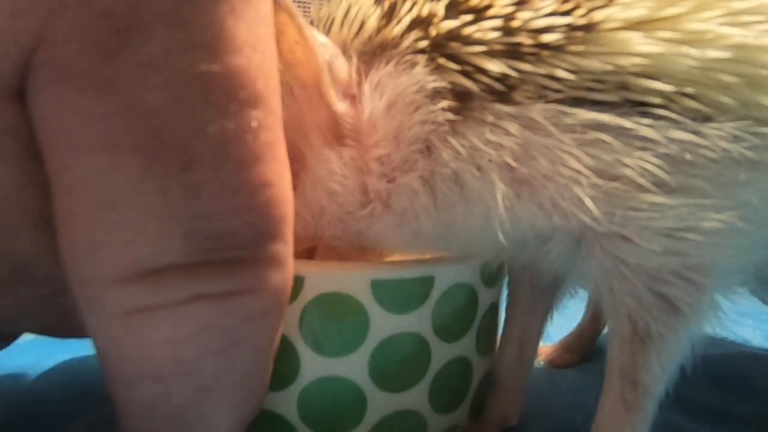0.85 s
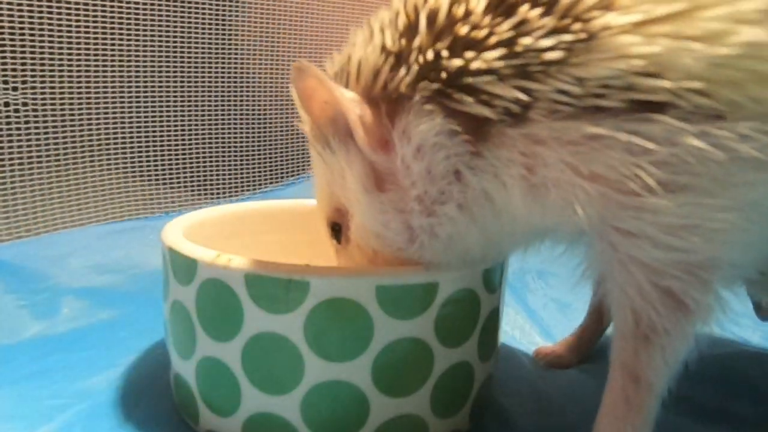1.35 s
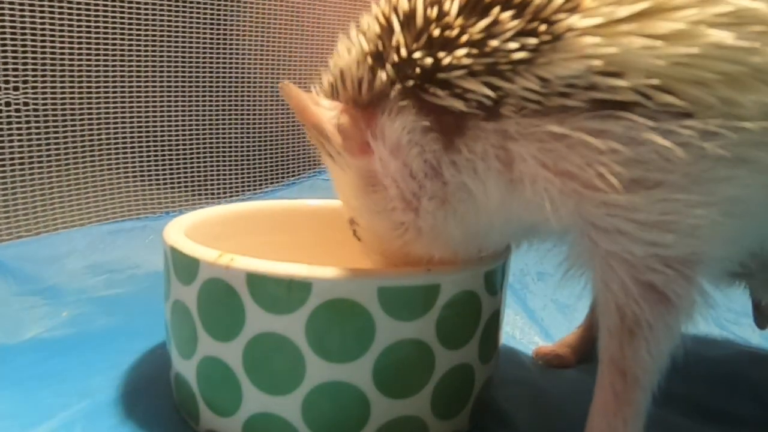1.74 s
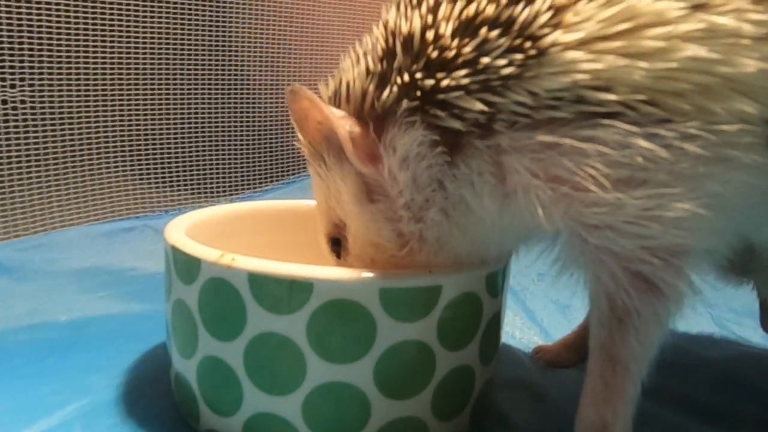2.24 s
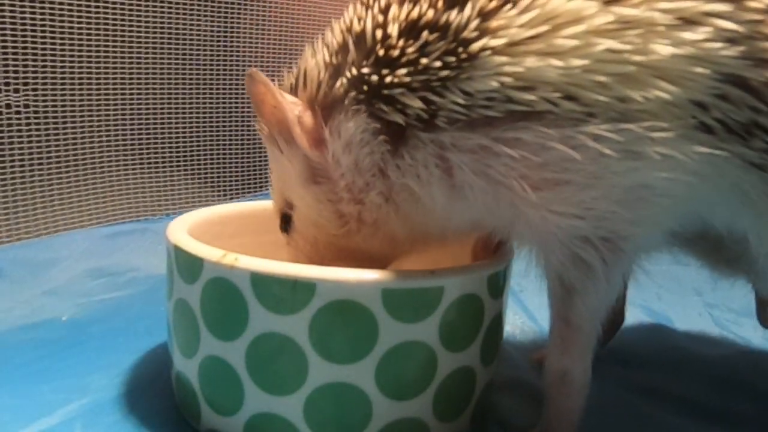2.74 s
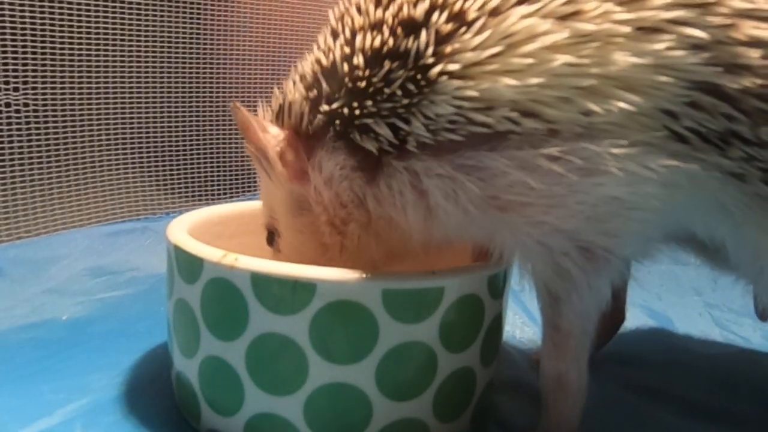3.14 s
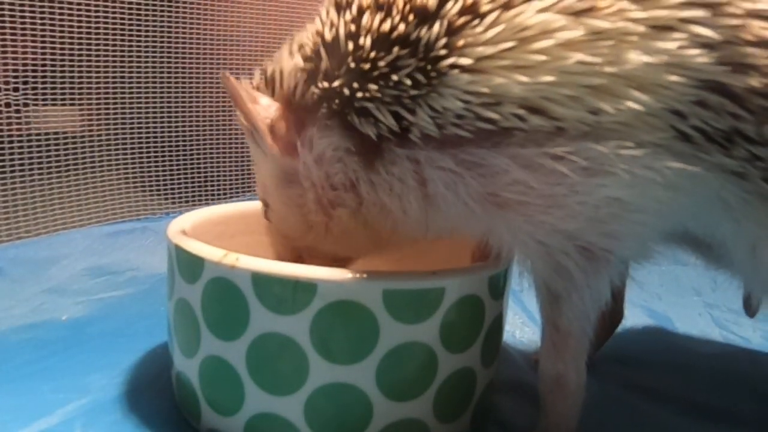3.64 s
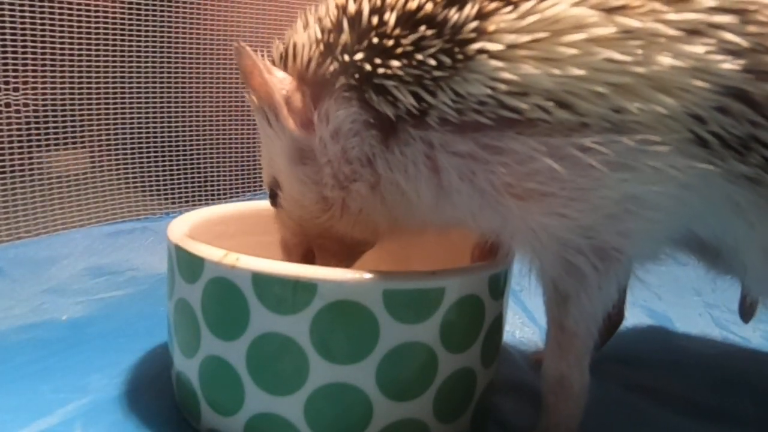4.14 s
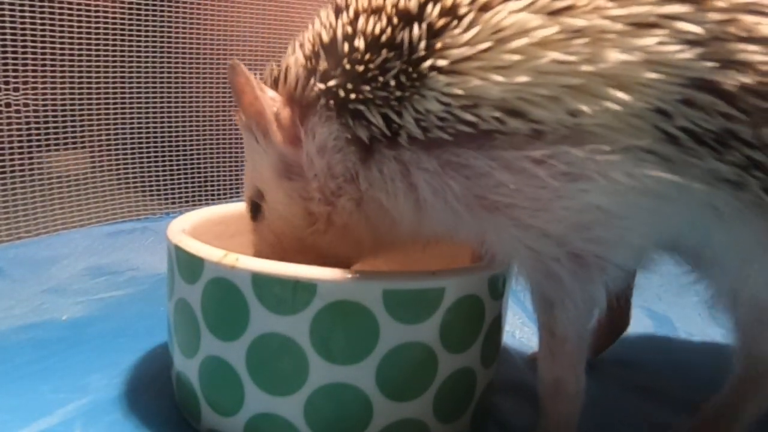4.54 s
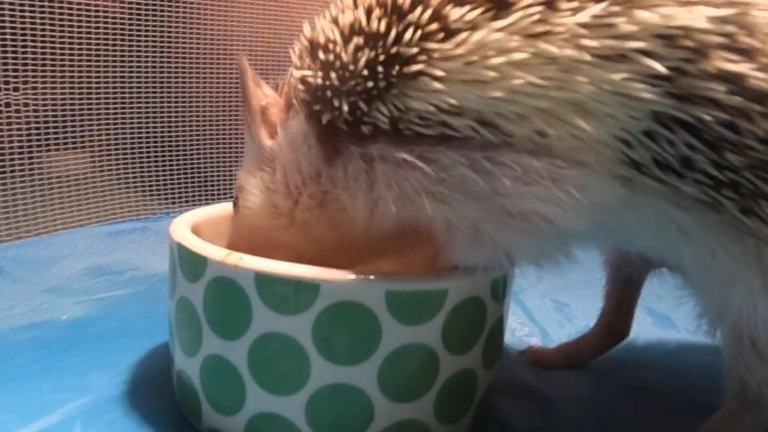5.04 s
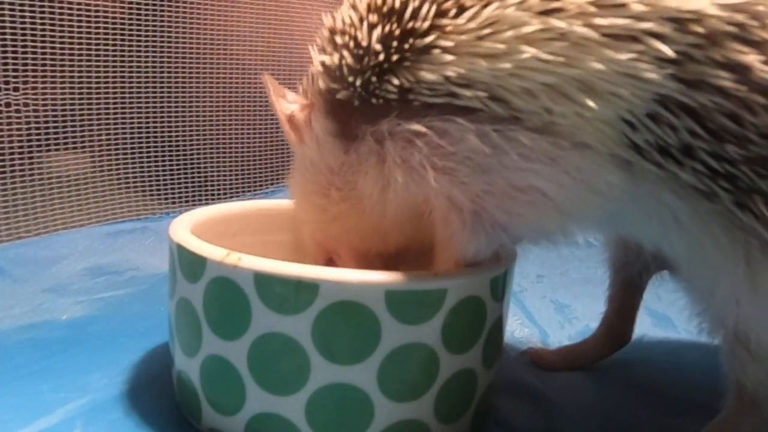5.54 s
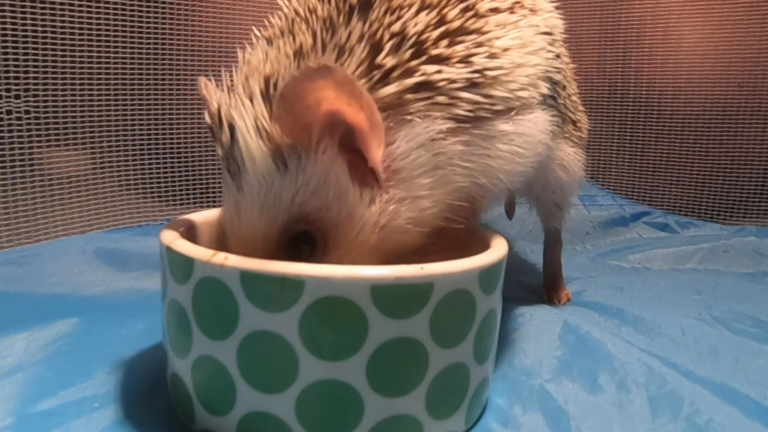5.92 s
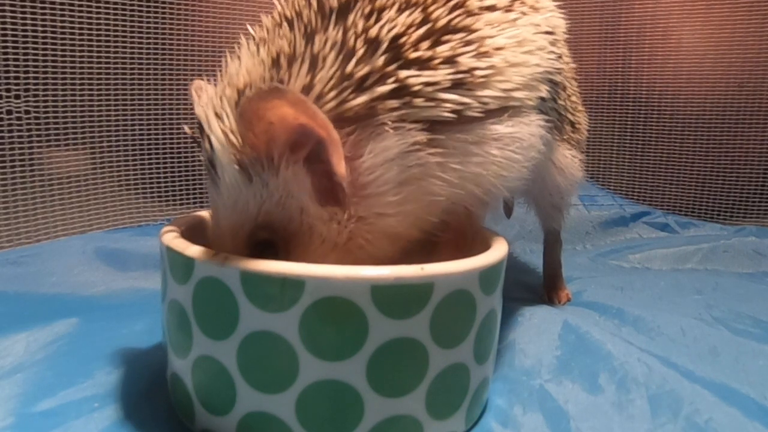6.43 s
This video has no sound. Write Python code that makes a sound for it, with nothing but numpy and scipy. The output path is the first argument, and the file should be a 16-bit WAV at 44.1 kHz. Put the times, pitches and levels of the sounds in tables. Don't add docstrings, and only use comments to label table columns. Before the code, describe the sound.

Close, rapid wet licking and smacking at a small ceramic bowl, about five a second, with faint knocks and gritty ticks in a quiet room.

```python
import sys
import numpy as np
from scipy import signal
from scipy.fft import rfft, irfft, next_fast_len
from scipy.io import wavfile
from scipy.ndimage import uniform_filter1d, map_coordinates

SR = 44100
rng = np.random.default_rng(int(sys.argv[2]) if len(sys.argv) > 2 else 0)


def ratio(d):
    e = np.asarray(d, float) / 20
    return 10 ** e


def generate_wav(signal):
    frames = np.transpose(np.atleast_2d(signal))
    scaled = np.clip(frames, -1, 1) * 32767
    pcm = np.round(scaled).astype(np.int16)
    wavfile.write(sys.argv[1], SR, pcm)


N = 294588

# (time [s], smack level [dB], wet body re smack [dB], bowl knock re smack [dB])
FULL_LICKS = [(0.89, -51, 2, -24), (1.215, -49.5, -4, -13), (1.477, -54, -3, -7.5), (1.68, -51, -7, -10),
              (1.89, -52.5, -6, -6), (2.09, -49.5, -21, -7.5), (2.281, -48, -5.5, -6),
              (2.484, -52, -5, -17), (2.677, -52.5, -3, -4), (2.875, -47, -8.5, -12), (3.073, -51, -5, -8),
              (3.27, -52.5, -6, -9), (3.466, -50.5, -9, -20), (3.663, -51, -5.5, -7),
              (3.872, -53, -0.5, -5.5), (4.075, -51.5, -4.5, -3), (4.285, -53.5, -6, -2.5),
              (4.494, -55.5, -6, -5.5), (4.691, -55, -3.5, -5), (4.9, -51.5, -24, -9),
              (5.108, -54.5, -2, -9), (5.339, -53.5, -0.5, -5.5), (5.585, -51.5, -6.5, -5),
              (5.869, -47, -1, -4.5), (6.153, -55, -0.5, -2), (6.401, -56.5, -0.5, -3),
              (6.63, -55.5, -6, 0)]
# (time [s], smack level [dB], wet body re smack [dB])
RETURN_LICKS = [(0.026, -64, 9), (1.05, -62.5, 9), (1.313, -63.5, 9.5), (1.56, -58.5, 2),
                (1.772, -59.5, -4), (1.972, -60.5, -20), (2.172, -59, -17.5), (2.364, -61, -13),
                (2.566, -57.5, -21), (2.76, -62, -11), (2.957, -61, -15), (3.152, -59.5, -23),
                (3.351, -61, -58), (3.556, -61, 0.5), (3.76, -63, 3.5), (3.962, -63.5, 5),
                (4.166, -62, -23.5), (4.381, -64, -21), (4.58, -61.5, 2.5), (4.791, -65, -38),
                (4.998, -65.5, 9), (5.21, -80, -5), (5.71, -69, 7), (5.97, -74, -0.5), (6.26, -70, -3),
                (6.5, -75, -6)]
# (time [s], level [dB])
TIP_TOUCHES = [
    (1.657, -58),
    (2.07, -57),
    (2.261, -53),
    (3.048, -53),
    (3.85, -58),
    (4.252, -56),
]
# (frequency [Hz], width [Hz], level [dB])
SMACK_MODES = [(9300, 2870, 31), (7540, 580, 5), (13000, 2900, 6)]
# (frequency [Hz], width [Hz], level [dB])
MOUTH_MODES = [(5130, 2430, 0.5), (2850, 3600, 1.5)]
# (frequency [Hz], width [Hz], level [dB])
FOOT_MODES = [(724, 440, 0)]
# (frequency [Hz], width [Hz], level [dB])
WALL_MODES = [(1380, 310, 0)]
# (time [s], peak [dB])
FOOD_SNAPS = [(1.2155, -33.5), (1.218, -38), (1.6723, -42), (1.6766, -42), (1.6828, -37), (1.888, -44),
              (2.0883, -43), (2.09, -38), (2.28, -38), (2.2813, -42), (2.4868, -39), (2.6763, -38),
              (2.8756, -37.5), (3.0746, -39), (3.153, -40), (3.2654, -40), (3.2683, -36.5), (3.4646, -34),
              (3.6591, -39), (3.6632, -42), (3.8704, -38), (4.071, -38), (4.0768, -42), (4.2828, -36.5),
              (4.492, -47), (4.4937, -39), (4.6873, -44), (4.6915, -38), (4.899, -43), (5.58, -35),
              (5.5844, -35.5), (5.867, -51), (5.8704, -42), (6.4028, -40), (6.6245, -45), (6.63, -42)]
# (time [s], peak [dB], ring [Hz])
BUBBLES = [(.1091, -54, 8970), (.112, -57, 9300), (.1182, -57, 8960), (.1699, -43, 7400),
           (.5048, -50, 9250), (.531, -52, 9430), (.5374, -52, 9320), (.5422, -54, 9310),
           (.5881, -43, 8400), (.6325, -53, 10600), (.6327, -57, 6000), (1.1902, -58, 8340),
           (1.2417, -49, 8610), (1.3911, -58, 9130), (1.4061, -59, 8840), (1.7227, -52, 9000),
           (1.7869, -51, 9350), (1.8742, -56, 8860), (2.1732, -51, 8520), (2.7442, -61, 10460),
           (2.825, -48, 9240), (2.837, -56, 8910), (2.8495, -54, 8420), (3.3371, -62, 9050),
           (3.7358, -61, 9210), (4.1669, -49, 9070), (4.4071, -57, 8830), (4.7439, -58, 9280),
           (4.9921, -54, 9180), (5.1824, -61, 9350), (5.8449, -57, 9760), (5.9562, -57, 7290)]
# (time [s], peak [dB], ring [Hz])
SHARP_CRACKS = [
    (.0189, -36, 1900),
    (.0247, -34, 3000),
    (.0403, -47, 4000),
    (.7598, -29, 2600),
    (4.513, -38, 3900),
    (4.5132, -44, 2200),
    (4.5136, -52, 600),
    (5.1492, -40.5, 2650),
]
# (time [s], peak [dB], ring [Hz])
HARD_TICKS = [(0.9952, -45, 2600), (1.0103, -48, 2470), (1.017, -45.5, 4130), (1.033, -51, 3320),
              (1.0456, -53, 3010), (1.0733, -48, 2400), (1.1407, -51.5, 3300), (1.1648, -53, 2920),
              (1.205, -45.5, 3750), (1.459, -45, 3260), (1.5609, -42.5, 3700), (1.584, -49.5, 2040),
              (1.611, -48.5, 2120), (2.214, -49.5, 2180), (2.3641, -47, 3440), (2.7966, -51, 2160),
              (2.9077, -53, 3620), (3.178, -53, 2670), (3.5317, -43, 3650), (3.771, -53, 2550),
              (3.8786, -49, 3200), (4.0134, -51.5, 2930), (4.544, -47.5, 2510), (5.1403, -49.5, 1600),
              (6.202, -50, 2860)]
# (time [s], peak [dB], ring [Hz])
QUILL_TICKS = [(0.071, -43.5, 920), (0.5038, -63, 4000), (.519, -55, 6000), (.526, -61.5, 5000),
               (.421, -58, 8940), (1.19, -52, 4500), (1.3119, -40, 6000), (1.8018, -48, 4110),
               (1.8274, -46.5, 6420), (1.9159, -47, 5240), (1.921, -43.5, 4650), (1.9738, -41.5, 4680),
               (2.051, -58, 6420), (2.111, -50, 5770), (2.3143, -48, 4610), (2.4523, -42.5, 4600),
               (2.622, -47.5, 4030), (2.989, -49.5, 6550), (3.515, -42.5, 6590), (3.74, -52, 6120),
               (3.75, -46, 5030), (4.1853, -44, 6540), (4.5736, -51, 4130), (4.8305, -52, 3900),
               (5.2431, -48, 5800), (5.254, -44, 5920), (5.4273, -50.5, 5770), (5.6567, -44, 4450),
               (5.743, -48, 6400), (5.842, -45.5, 5130), (5.9676, -45, 5540), (5.989, -56.5, 5900),
               (6.5098, -44, 6000)]
# (time [s], peak [dB], ring [Hz])
GRIT_TICKS = [(0.8724, -46, 3640.0), (0.902, -38.5, 3250), (0.947, -52, 4280.0), (0.987, -49, 2800.0),
              (0.99, -47, 2850.0), (1.0681, -54, 3300), (1.3435, -56.0, 3280.0), (1.359, -55, 3640.0),
              (1.362, -56.0, 3820.0), (1.3708, -49.5, 3520), (1.4426, -49.5, 2510), (1.787, -54, 4080.0),
              (1.808, -53, 3640.0), (1.9395, -57, 3340.0), (1.969, -49, 5040.0), (2.0504, -48, 5440),
              (2.1515, -63, 4640.0), (2.173, -56, 5210.0), (2.235, -54, 3270.0), (2.514, -50, 3600.0),
              (2.5365, -56, 4700.0), (2.5994, -54, 4120.0), (2.7417, -66, 2330.0), (3.0466, -62, 5640.0),
              (3.3016, -54, 4260.0), (3.497, -53, 3620.0), (3.767, -63, 3220.0), (3.7906, -51, 3650.0),
              (3.797, -54, 2900.0), (3.845, -53, 3390.0), (3.8594, -49, 3470.0), (3.9055, -54, 4500),
              (3.9998, -48.5, 4100), (4.113, -50, 3580.0), (4.1513, -68, 3710.0), (4.2386, -57, 2300.0),
              (4.3153, -61, 2790.0), (4.322, -39, 5400), (4.4482, -52, 3290.0), (4.462, -51, 4050.0),
              (4.4757, -52, 4140.0), (4.5975, -57, 4240), (4.73, -60, 3120), (4.77, -63, 4120.0),
              (4.936, -46.5, 5200), (4.9527, -56, 3080.0), (5.0386, -49.5, 4020), (5.2563, -59, 5540.0),
              (5.3626, -47, 4150.0), (5.935, -48, 4820.0), (6.1355, -49, 5070.0), (6.223, -50.5, 3200),
              (6.295, -57, 4610.0), (6.4146, -45.5, 5130.0), (6.4324, -54, 2510), (6.439, -59, 3660)]
# (time [s], level [dB], rise [ms], fall [ms])
GRIND_BURSTS = [(0.021, -45, 1.5, 10), (0.693, -43, 6.9, 7.6), (0.709, -35.5, 11.8, 12.4),
                (.724, -37.5, 13, 14), (.752, -47, 19, 18), (0.799, -34, 29.4, 34.3), (.893, -54.5, 48, 49),
                (0.927, -52.5, 9.5, 8.7), (.99, -59, 50, 49), (1.11, -63, 58, 55), (1.26, -56.5, 11, 15),
                (3.905, -57, 16, 15), (4.315, -60.5, 7.8, 10)]
# (frequency [Hz], level [dB per Hz])
SHEET_COLOUR = [(180, -42.5), (300, -33), (412, -9.5), (462, -18), (749, -13), (1300, -7.5), (1900, -2.5),
                (2300, 0.5), (2880, -3.5), (3130, 0), (9880, -13), (13500, -24), (16000, -36)]
# (time [s], frequency [Hz],
# glide [Hz/s], half length [ms], level [dB])
GLAZE_SLIPS = [
    (.169, 7200, -100000, 2.5, -51),
    (.295, 11200, -120000, 25, -72),
    (2.43, 11400, 18000, 40, -74),
    (.669, 6200, 0, 4, -62),
    (4.322, 5600, -100000, 4, -59),
    (5.21, 11600, 9000, 85, -73),
]
# (frequency [Hz], level [dB per Hz])
RUSTLE_COLOUR = [(700, -18), (1300, 4), (2300, 0), (3300, -0.5), (5700, 0), (7500, -3), (10000, -94)]
# (time [s], level [dB])
BUSYNESS = [(0, -57), (.11, -64), (.24, -58), (.35, -84), (.43, -81), (.51, -62), (.6, -65), (.67, -58),
            (.86, -56.5), (1.07, -67.5), (1.4, -66), (2.4, -63.5), (3.2, -66.5), (4.5, -64), (5.35, -63.5),
            (5.55, -65.5), (6.02, -63.5), (6.09, -69), (6.68, -64)]
# (time [s], level [dB], rise [ms], fall [ms])
SNIFFS = [
    (5.3, -80, 150, 150),
    (5.72, -74, 130, 130),
    (5.93, -79, 60, 90),
]
# (frequency [Hz], level [dB])
LEFT_SHADE = [(300, -2), (1200, -8.5), (2500, -5.5), (4000, -4), (5500, -0.5), (7000, -2), (9000, -5),
              (11000, -5), (14000, -8.5)]
# (frequency [Hz], share [0-1])
PORT_SHARE = [(600, 0.18), (1700, 0.82), (4000, 0.99), (6300, 0.94), (8500, 0.66), (12500, 0.36),
              (15000, 0.54)]
# (time [s], level [dB], frequency [Hz], half length [ms])
STAND_ROCKS = [
    (0.1905, -25.5, 16.35, 25),
    (.135, -38.5, 15, 15),
    (0.27, -34.5, 14, 29),
    (.412, -41.5, 11, 40),
    (.5, -54, 18, 35),
]
# (time [s], level [dB], frequency [Hz], half length [ms])
FOOT_BUMPS = [(0.177, -44, 205, 9.4), (.232, -44, 140, 7.9), (.281, -38, 119, 10.4), (.297, -45.5, 214, 17),
              (.272, -50, 450, 9.3), (0.301, -53, 432, 18), (.367, -41, 120, 11.6), (.385, -48.5, 212, 12),
              (0.416, -49.5, 177, 16), (.505, -48, 167, 20), (.6, -51.5, 168, 20)]
# (time [s], level [dB], frequency [Hz], half length [ms])
MOTOR_SWELL = [
    (3.15, -56, 173, 140),
]
# (time [s], level [dB], rise [ms], fall [ms])
SHOVES = [
    (.025, -61, 20, 11),
    (.33, -55.5, 210, 210),
]
# (time [s], level [dB], rise [ms], fall [ms])
JOINT_CREAKS = [
    (.025, -48, 14, 36),
    (.27, -50, 72, 58),
    (.36, -57, 43, 70),
    (.68, -61, 46, 40),
]
# (time [s], level [dB], rise [ms], fall [ms])
FINGER_SLIDES = [
    (.02, -56, 23, 51),
    (.2, -56.5, 360, 130),
    (.62, -65.5, 330, 140),
]
# (time [s], level [dB], rise [ms], fall [ms])
FINGER_SKID = [
    (.62, -63, 130, 90),
]
# (frequency [Hz], width [Hz], level [dB])
SKIN_MODES = [(1300, 480, 5), (2340, 280, 8), (3110, 930, 2.5), (4600, 240, -0.5)]
# (time [s], peak [dB])
WEIGHT_SHIFTS = [(0.984, -73), (1.143, -69), (1.27, -70), (1.393, -69), (1.522, -55), (1.885, -56),
                 (2.038, -56), (2.168, -62), (2.415, -57), (2.573, -56), (2.958, -56), (3.093, -54.5),
                 (3.408, -69), (3.577, -54), (3.773, -57), (4.047, -57), (4.224, -55), (4.597, -58),
                 (4.758, -63), (4.967, -56), (5.45, -62), (6.203, -66)]
# (time [s], level [dB])
FLOOR_SWAY = [(0, -75), (.38, -49.5), (.7, -57), (1.25, -76), (1.73, -59), (2.0, -69), (4.1, -60.5),
              (5.1, -77), (6.68, -64.5)]
# (frequency [Hz], width [Hz], level [dB])
STAND_MODES = [(63.2, 23, 14.5), (29.3, 14.5, 6)]
# (time [s], frequency [Hz], level [dB])
MOTOR_DRONE = [(0, 153, -66.5), (.5, 153.5, -63), (.75, 154, -68), (1.25, 154.5, -71), (1.73, 149, -66),
               (2.18, 147.5, -63.5), (2.55, 152.5, -66), (2.91, 154.5, -65), (3.15, 155.5, -61.5),
               (3.43, 156, -66.5), (3.88, 157.5, -59), (4.12, 159, -68), (4.56, 159.8, -54.5),
               (4.77, 160, -64.5), (5.0, 161.5, -57.5), (5.26, 162, -76), (5.68, 162, -73),
               (6.68, 163.8, -93)]
# (time [s], level [dB], rise [ms], fall [ms])
AIR_PUFFS = [
    (4.55, -66, 60, 50),
    (5.36, -63, 90, 140),
    (0.14, -62, 50, 34),
]
# (time [s], level [dB])
AIR_LEVEL = [(0, -54.5), (1.3, -59), (2.6, -56), (3.3, -57), (4.2, -58), (5.2, -58.5), (6.68, -59)]
# (frequency [Hz], level [dB per Hz])
AIR_COLOUR = [(15, -48), (25, -13), (97, -11.5), (135, -1.5), (175, 5.5), (230, 0.5), (373, -5.5),
              (575, -13), (760, -5), (990, -12.5), (1800, -21), (2600, -21.5), (3600, -30.5), (6000, -31),
              (10000, -54), (14000, -44), (16000, -74)]
# (frequency [Hz], left-right likeness [-1 to 1])
AIR_LIKENESS = [(60, 0.59), (130, 0.36), (290, 0.42), (640, -0.62), (1400, -0.77), (3100, 0.31),
                (7000, -0.21)]


def unit(x):
    return x / np.sqrt(np.mean(x ** 2) + 1e-20)


def along(points, hz):
    f, v = np.transpose(points)
    return np.interp(np.log(hz + 1), np.log(f + 1), v)


def curves(rows):
    s, *cols = np.transpose(rows)
    return [np.interp(np.arange(N) / SR, s, c) for c in cols]


def wobble(rate_hz):
    knots = rng.standard_normal(int(N * rate_hz / SR) + 4)
    return map_coordinates(knots, [np.arange(N) * rate_hz / SR])


def filtered(x, response):
    m = next_fast_len(N + SR // 2)
    return irfft(rfft(x, m) * response(np.fft.rfftfreq(m, 1 / SR)), m)[..., :N]


def modes(table):
    def response(f):
        return sum((-1) ** k * ratio(db) * 1j * f * w / (c * c - f * f + 1j * f * w)
                   for k, (c, w, db) in enumerate(table))
    return response


def twice(table):
    return lambda f: modes(table)(f) ** 2


def colour(points):
    return lambda f: ratio(along(points, f))


def crackle(rate_hz, spread_db, life_ms, smooth):
    starts = (rng.random(N) < rate_hz / SR) * ratio(spread_db * rng.standard_normal(N))
    decay = np.exp(-1000 / (life_ms * SR))
    bursts = unit(signal.filtfilt([1], [1, -decay], starts)) + smooth
    level = np.sqrt(np.abs(uniform_filter1d(bursts ** 2, size=500)))
    return unit(bursts / level * rng.standard_normal(N))


def patchy(x, depth_db):
    z = signal.stft(x, nperseg=256)[2]
    field = uniform_filter1d(rng.standard_normal(z.shape), size=9, axis=0)
    field = uniform_filter1d(field, size=8, axis=1)
    return unit(signal.istft(z * ratio(depth_db * unit(field)), nperseg=256)[1][:N])


def swells(s, db, rise_ms, fall_ms, drop_db):
    gain, t_ms = np.zeros(N + SR), np.arange(-SR // 4, SR // 4) * 1000 / SR
    for at, top_db, rise, fall in zip(s, db, np.maximum(rise_ms, 1), np.maximum(fall_ms, 1)):
        slope = np.where(t_ms < 0, -t_ms / rise, t_ms / fall)
        gain[round(at * SR):][:len(t_ms)] += ratio(top_db - drop_db * slope ** 2.31)
    return gain[SR // 4:][:N]


def per_stroke(rows, rest_db, top_db, delay_s, rise_ms, fall_ms):
    s = np.transpose(rows)[0] + delay_s
    return ratio(rest_db) + swells(s, 0 * s + top_db, 0 * s + rise_ms, 0 * s + fall_ms, drop_db=7)


def pair(response, alike):
    turn = lambda f: np.arccos(np.clip(along(alike, f), -1, 1)) / 2
    noise = rng.standard_normal((2, N))
    mid, side = filtered(noise, lambda f: response(f) * [np.cos(turn(f)), np.sin(turn(f))])
    return unit(np.array([mid + side, mid - side]))


def licks():
    s, db, rise_ms, fall_ms, wet_db, knock_db, load_db = strokes()
    peel = crackle(rate_hz=1100, spread_db=3, life_ms=.18, smooth=1.2)

    touch_s, touch_db = np.transpose(TIP_TOUCHES)
    touch = swells(touch_s, touch_db, 0 * touch_s + 5, 0 * touch_s + 5, drop_db=34)
    top = swells(s, db + 0.47, rise_ms - 1.5, fall_ms - 1.5, drop_db=32)
    slide = swells(s - .008, db + load_db - 15, rise_ms + 22, fall_ms + 30, drop_db=9)
    smack = (top + slide + touch) * unit(filtered(peel, modes(SMACK_MODES)))

    wet_gain = swells(s, db + wet_db - 5.5, rise_ms - 1.5, fall_ms - 1.5, drop_db=22)
    wet = wet_gain * unit(filtered(peel, twice(MOUTH_MODES)))

    rim = np.clip(.3 + .15 * wobble(4), 0, 1)
    foot = unit(filtered(peel, twice(FOOT_MODES)))
    wall = unit(filtered(peel, twice(WALL_MODES)))
    bowl = np.sqrt(1 - rim ** 2) * foot + rim * wall
    knock = swells(s, db + knock_db - 0.5, 0.99 * rise_ms, 0.38 * fall_ms, drop_db=18.5) * bowl

    gulp = swells(s + 0.024, load_db - 68, 0 * s + 22, 0 * s + 18, drop_db=64)
    mash = crackle(rate_hz=600, spread_db=5, life_ms=.3, smooth=.7)
    slurp = gulp * unit(filtered(mash, colour(RUSTLE_COLOUR)))
    return smack + wet + knock + slurp


def strokes():
    firm_db, slower_ms_per_db = -47, 1.4
    s, db, wet_db, knock_db = np.transpose(FULL_LICKS)
    slower_ms = slower_ms_per_db * (firm_db - db)
    full = [s, db, 8.8 + slower_ms, 8.03 + 0.34 * slower_ms, wet_db, knock_db, 0 * s]
    s, db, wet_db = np.transpose(RETURN_LICKS)
    rise_ms, fall_ms, knock_db, load_db = 17, 38, -15, -30
    back = [s, db, 0 * s + rise_ms, 0 * s + fall_ms, wet_db, 0 * s + knock_db, 0 * s + load_db]
    return np.hstack([full, back])


def pops():
    bubble_gain_db, snap_hz, attack_s = 5, 9540, .00025
    out, t = np.zeros(N + SR), np.arange(200) / SR
    rows = [(s, db + bubble_gain_db, hz) for s, db, hz in BUBBLES]
    rows += [(s, db, snap_hz) for s, db in FOOD_SNAPS]
    shape = t / attack_s * np.exp(1 - t / attack_s)
    for (s, db, hz), noise in zip(rows, rng.standard_normal((len(rows), len(t)))):
        ring = np.sin(2 * np.pi * hz * (1 + .04 * noise[0]) * t) + .38 * noise
        out[round((s - attack_s) * SR):][:len(t)] += ratio(db) * shape * ring
    return out[:N]


def ticks():
    faint_db, faint_hz = -68, 3300
    out, t = np.zeros(N + SR), np.arange(300) / SR
    at, size, pitch = rng.random((3, 50))
    faint = zip(1.2 + 5.3 * at, faint_db + 5 * size, faint_hz * (.6 + pitch))
    rows = [*SHARP_CRACKS, *HARD_TICKS, *QUILL_TICKS, *GRIT_TICKS, *faint]
    for (s, db, hz), noise in zip(rows, rng.standard_normal((len(rows), len(t)))):
        ring = np.sin(2 * np.pi * hz * t) * np.exp(-t * hz / 1.15) * (1 - np.exp(-t * hz / .3))
        push = .18 * np.sin(1.1 * np.pi * hz * t) * np.exp(-t * hz / 1.6)
        snap = .22 * noise * np.exp(-t / .0003)
        out[round((s - .0003) * SR):][:len(t)] += ratio(db + 10) * (ring + push + snap)
    return filtered(out[:N], lambda f: f * f / (f * f + 500 ** 2) / (1 + (f / 11500) ** 4))


def drags():
    grit = crackle(rate_hz=2500, spread_db=1.5, life_ms=.15, smooth=3)
    grind = unit(filtered(grit, colour(SHEET_COLOUR)))
    return swells(*np.transpose(GRIND_BURSTS), drop_db=10) * grind


def squeaks():
    out, t = np.zeros(N), np.arange(N) / SR
    for s, hz, glide, ms, db in GLAZE_SLIPS:
        whistle = np.sin(2 * np.pi * (hz + glide * (t - s) / 2) * (t - s))
        out += swells([s], [db], [ms], [ms], drop_db=12) * whistle
    return out


def fur():
    push = per_stroke(FULL_LICKS, rest_db=0, top_db=-7, delay_s=0.033, rise_ms=17, fall_ms=146)
    hairs = crackle(rate_hz=500, spread_db=2, life_ms=0.15, smooth=1)
    brush = unit(filtered(hairs, colour(RUSTLE_COLOUR)))
    level_db = curves(BUSYNESS)[0] + 2 * wobble(55) + wobble(140) - 6
    return ratio(level_db) * push * patchy(brush, depth_db=3)


def mouth():
    opening = per_stroke(RETURN_LICKS, rest_db=-3.5, top_db=-7, delay_s=0.039, rise_ms=24, fall_ms=40)
    spit = crackle(rate_hz=2700, spread_db=5, life_ms=1, smooth=1)
    hiss = unit(filtered(spit, modes(SMACK_MODES)))
    level_db = curves(BUSYNESS)[0] + 1.5 * wobble(40) - 5
    return ratio(level_db) * opening * patchy(hiss, depth_db=3)


def sniffs():
    nose = unit(filtered(rng.standard_normal(N), twice([(2260, 170, 0)])))
    return swells(*np.transpose(SNIFFS), drop_db=8) * nose


def hush():
    full_quiet_s, lead_s, half_length_share = .32, -.055, .15
    s = np.transpose(FULL_LICKS[2:])[0]
    wait_s = np.diff(s)
    depth_db = 40 * np.log10(np.minimum(wait_s / full_quiet_s, .7))
    half_ms = 1000 * half_length_share * wait_s
    return 1 - swells(s[1:] + lead_s, depth_db, half_ms, half_ms, drop_db=6)


def ports(right, left):
    lag_samples = 1.3
    z = signal.stft(left, nperseg=64)[2]
    scattered = z * np.exp(2j * np.pi * rng.random(z.shape))
    scattered = 2.4 * signal.istft(scattered, nperseg=64)[1][:N]
    late = lambda f: ratio(along(LEFT_SHADE, f)) * np.exp(-2j * np.pi * f * lag_samples / SR)
    share = lambda f: np.clip(along(PORT_SHARE, f), 0, 1)
    direct = filtered(left, lambda f: late(f) * share(f))
    diffuse = filtered(scattered, lambda f: late(f) * np.sqrt(1 - share(f) ** 2))
    return np.array([direct + diffuse, right])


def rocking():
    out, t = np.zeros(N), np.arange(N) / SR
    for s, db, hz, ms in [*STAND_ROCKS, *FOOT_BUMPS, *MOTOR_SWELL]:
        out += ratio(db) * np.sin(2 * np.pi * hz * (t - s)) * np.exp(-((t - s) * 1000 / ms) ** 2)
    return ratio([[-1.2], [1.2]]) * out


def hand():
    def gain(rows, rest_db):
        return ratio(rest_db) + swells(*np.transpose(rows), drop_db=24.5)

    held = np.clip((.68 - np.arange(N) / SR) / 0.0099, 0, 1)
    body = modes([(103, 89, -1), (222.6, 124, 0), (45, 29, -6.5)])
    rumble = gain(SHOVES, -72) * ratio(3.5 + 2.8 * wobble(59)) * pair(body, [(100, 0.99)])
    creak = gain(JOINT_CREAKS, -70) * ratio(-7) * pair(twice([(400, 350, 0)]), [(400, 1)])
    skin = pair(twice(SKIN_MODES), [(2000, 0.77)])
    slide = gain(FINGER_SLIDES, -76) * ratio(-2 + 1.7 * wobble(27.7)) * skin
    skin_off = pair(twice([(2400, 450, 0), (3050, 600, 2)]), [(2000, .8)])
    skid = swells(*np.transpose(FINGER_SKID), drop_db=8) * skin_off
    return held * (rumble + creak + slide + skid)


def thuds():
    out, t = np.zeros(N + SR), np.arange(SR // 4) / SR
    for (s, db), hz in zip(WEIGHT_SHIFTS, rng.uniform(53.6, 78.6, len(WEIGHT_SHIFTS))):
        swing = np.sin(2 * np.pi * hz * t) * t / 0.026 * np.exp(-t / 0.016)
        out[round(s * SR):][:len(t)] += ratio(db + 12.5) * swing
    return out[:N]


def shaking():
    return ratio(curves(FLOOR_SWAY)[0] - 6) * pair(twice(STAND_MODES), [(60, 0.77)])


def drone():
    hz, db = curves(MOTOR_DRONE)
    turns = np.cumsum(hz + .6 * wobble(4.4)) / SR
    return ratio(db + 3.5) * np.sin(2 * np.pi * turns + [[0], [.4]])


def air():
    still = ratio(curves(AIR_LEVEL)[0] + 0.83 * wobble(2.82)) * pair(colour(AIR_COLOUR), AIR_LIKENESS)
    puffs = swells(*np.transpose(AIR_PUFFS), drop_db=4) * pair(twice([(400, 300, 0)]), AIR_LIKENESS)
    return still + puffs


def scene():
    near = licks() + hush() * (fur() + mouth()) + sniffs() + squeaks()
    drag, tick = drags(), ticks() + pops()
    right = near + drag + tick
    left = near + ratio(-3) * drag + ratio(-2.5) * tick
    room = ratio([[.8], [-.8]]) * (thuds() + shaking() + drone() + air())
    return ratio(4) * ports(right, left) + rocking() + hand() + room


def top_cut(x):
    return signal.sosfilt(signal.butter(12, 16220, fs=SR, output="sos"), x)


def record(dry):
    heard = filtered(dry, lambda f: (f < 15830) / (1 + (f / 14500) ** 22))
    return top_cut(heard)


dry = scene()
out = record(dry)
generate_wav(out)
```